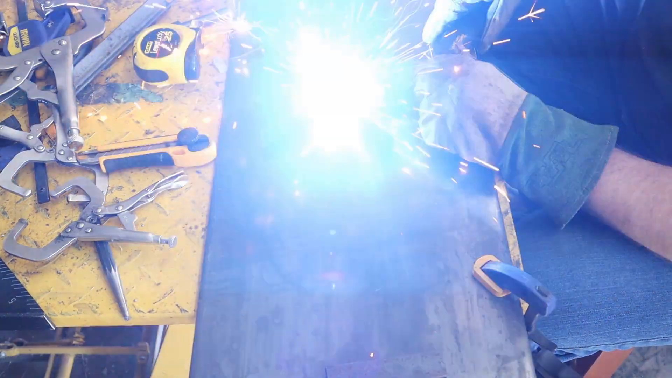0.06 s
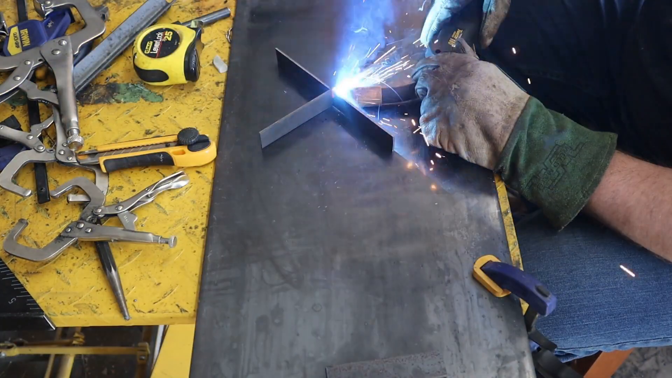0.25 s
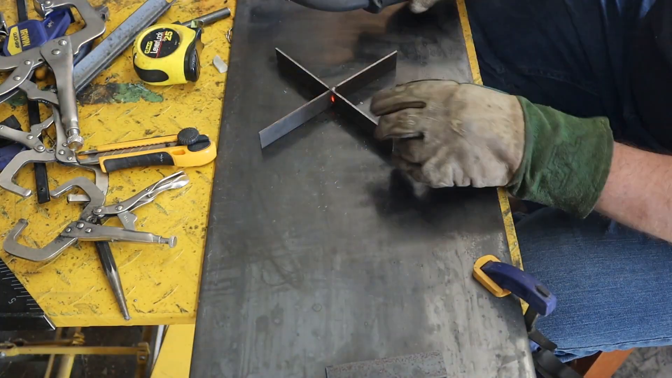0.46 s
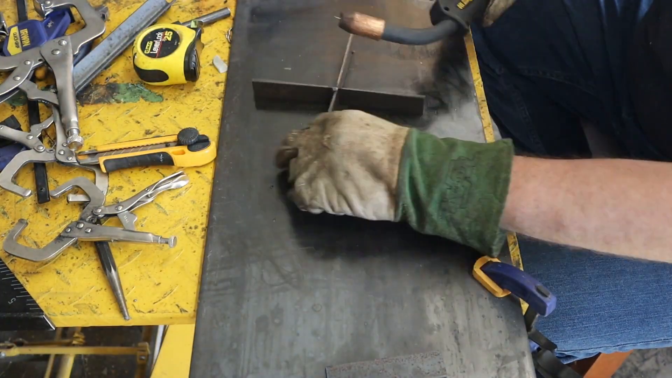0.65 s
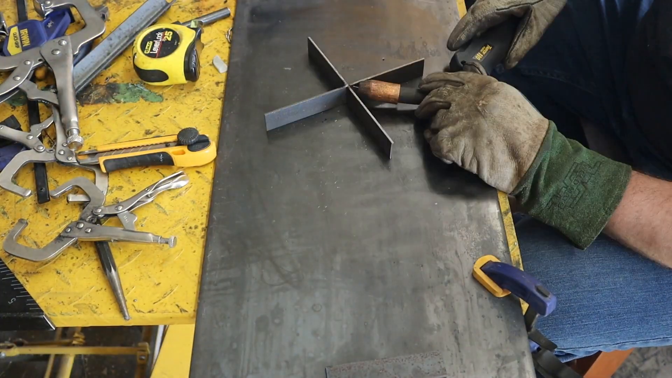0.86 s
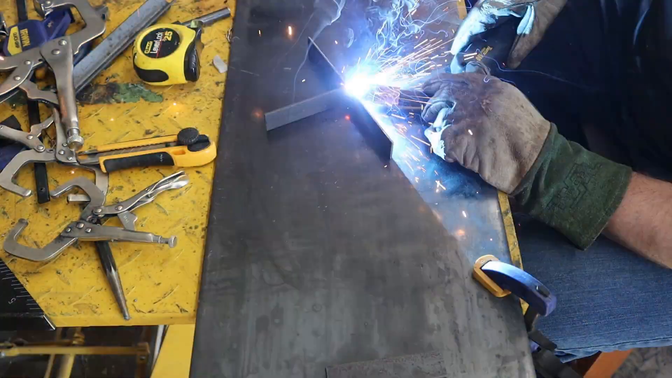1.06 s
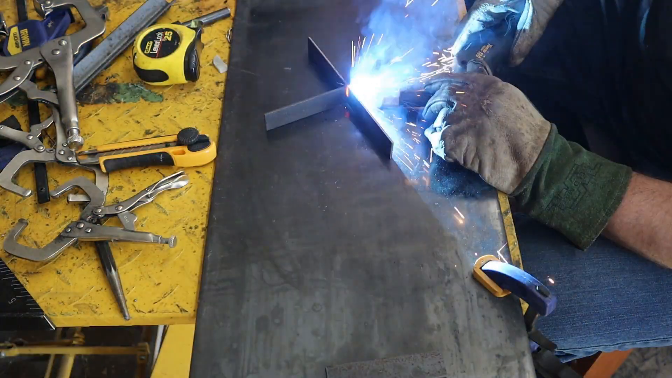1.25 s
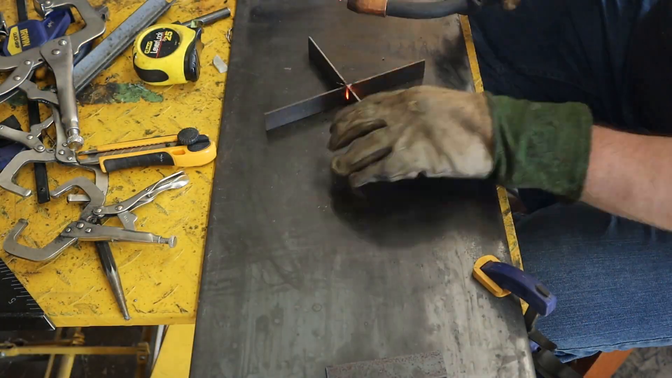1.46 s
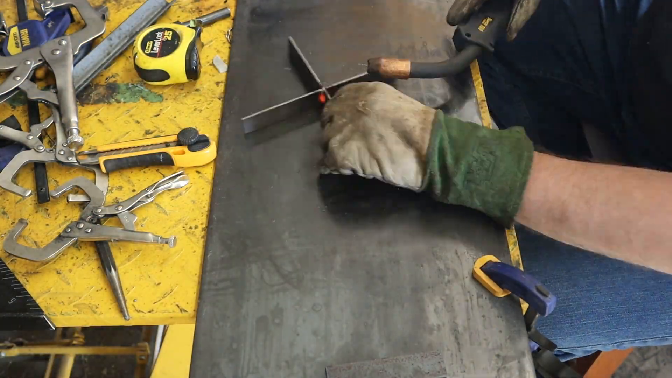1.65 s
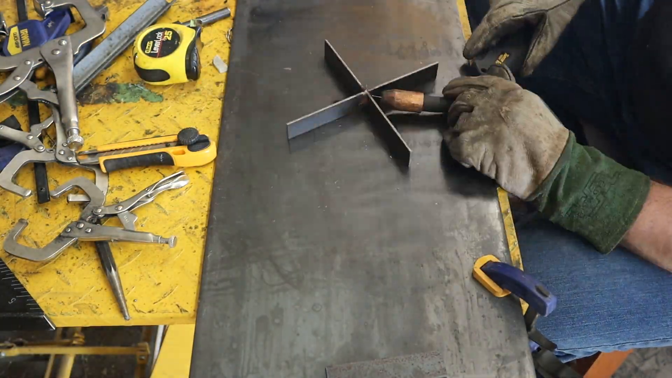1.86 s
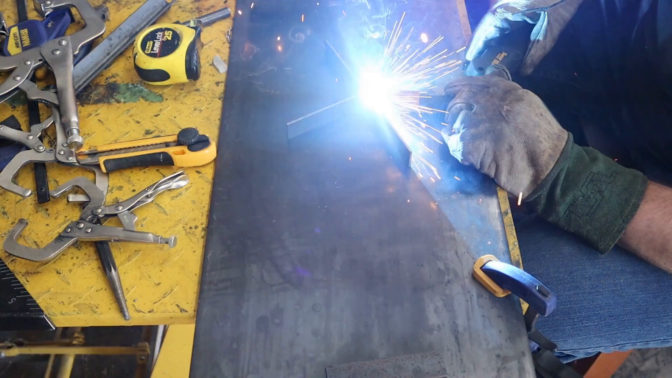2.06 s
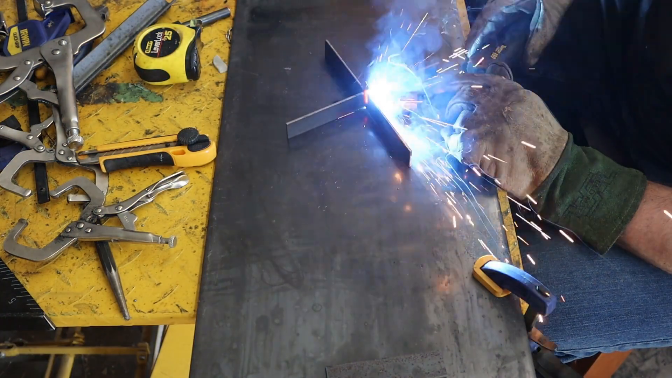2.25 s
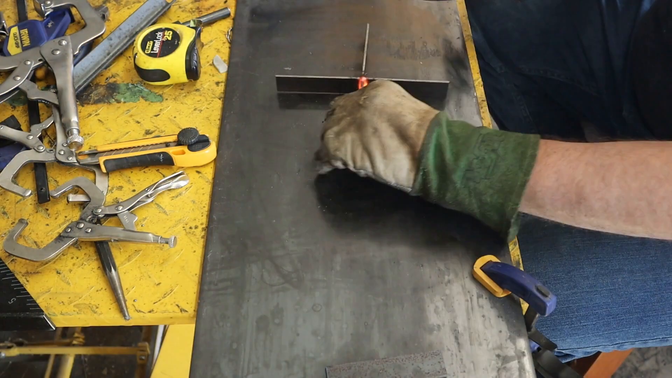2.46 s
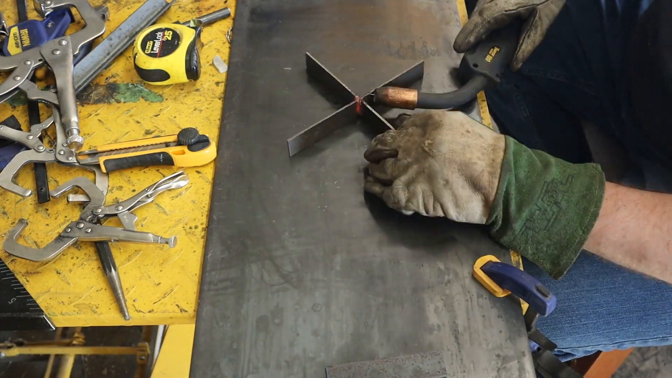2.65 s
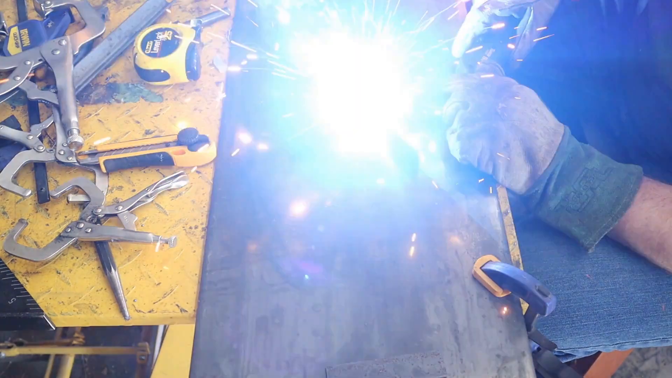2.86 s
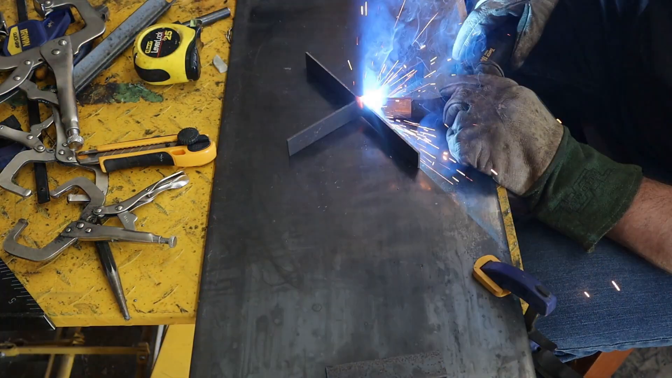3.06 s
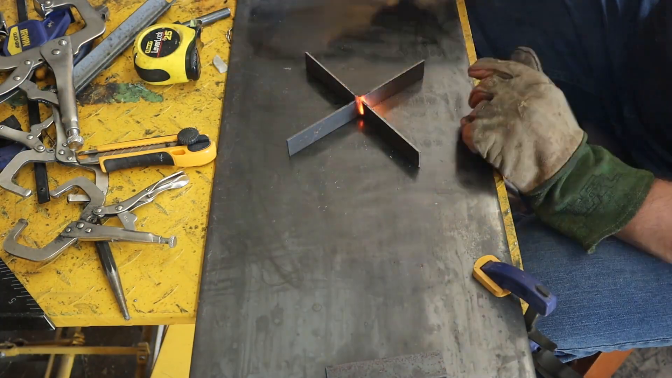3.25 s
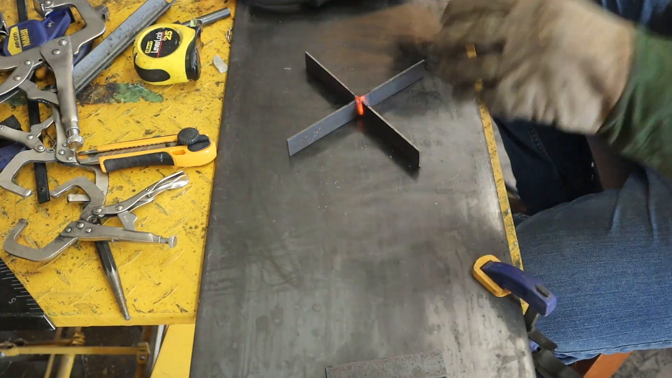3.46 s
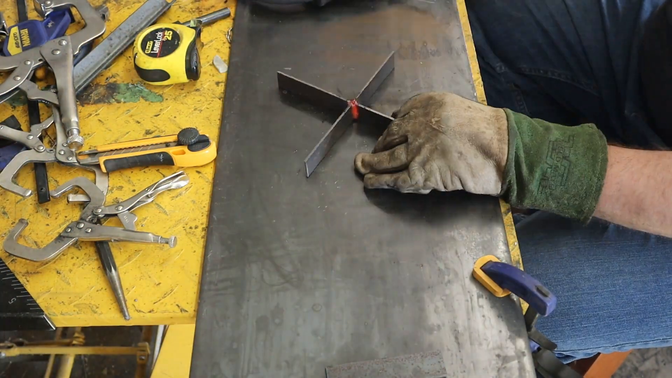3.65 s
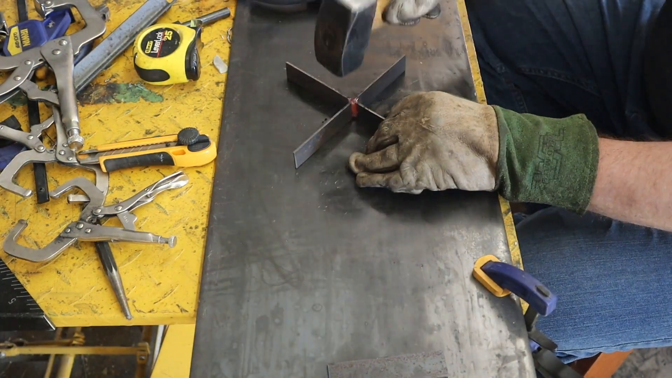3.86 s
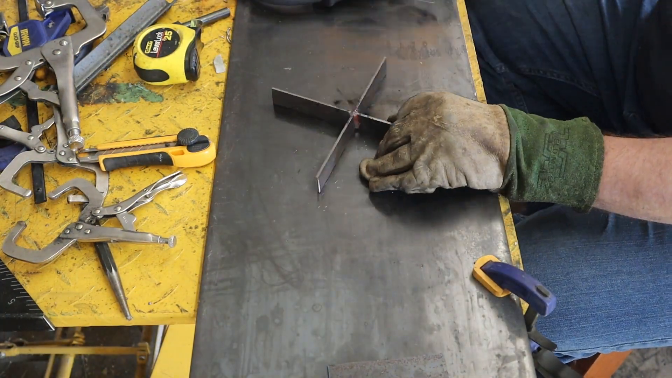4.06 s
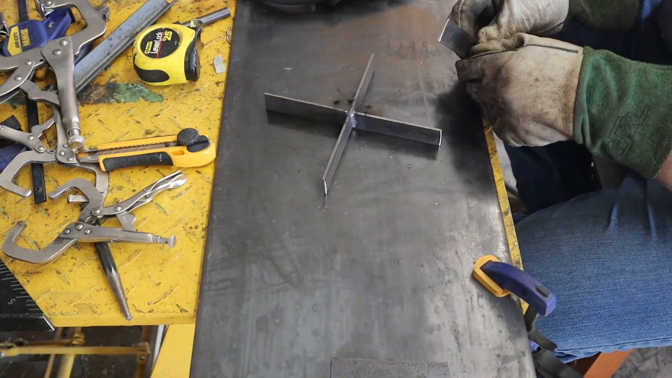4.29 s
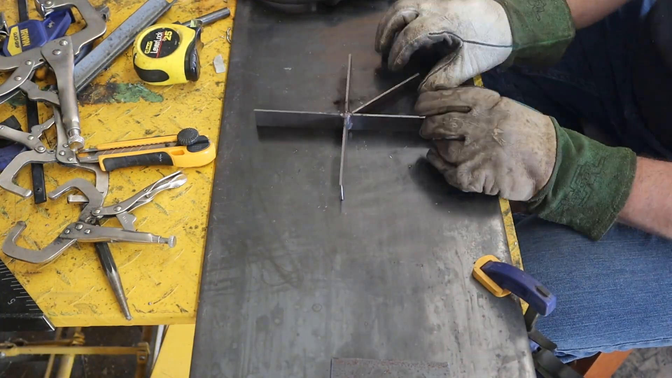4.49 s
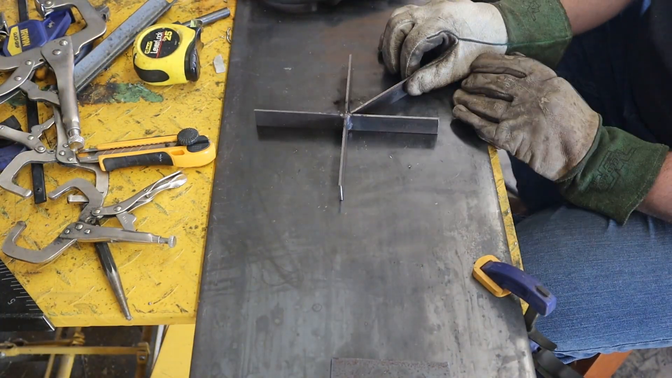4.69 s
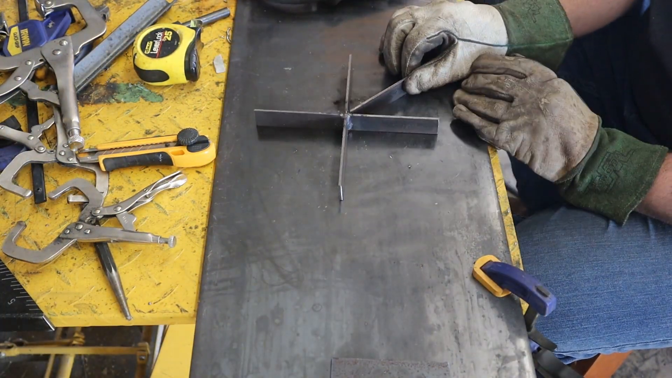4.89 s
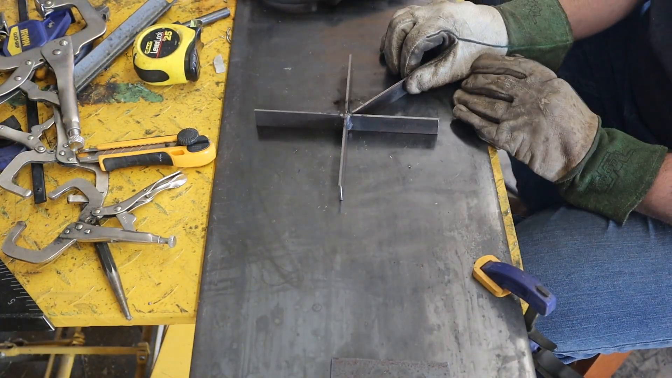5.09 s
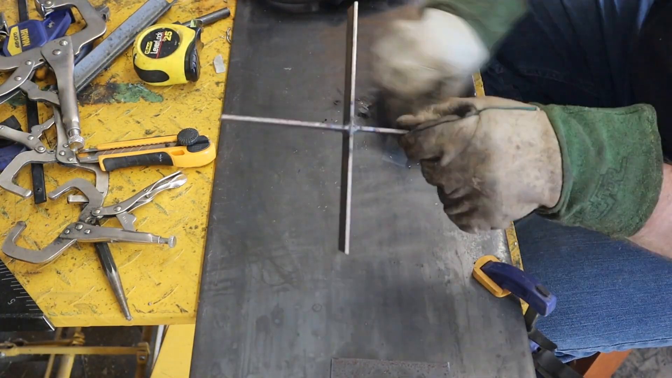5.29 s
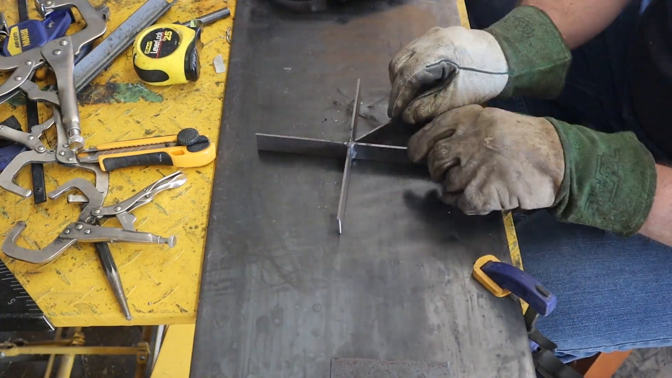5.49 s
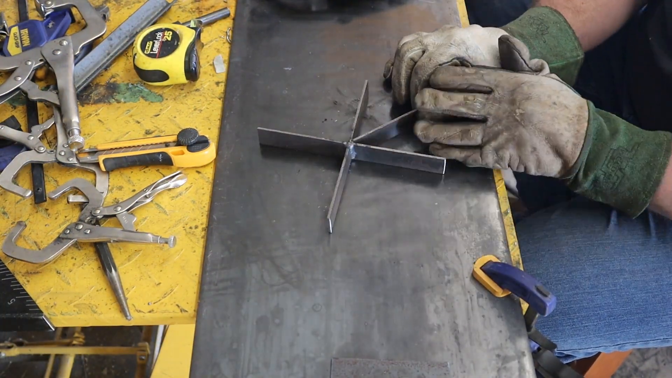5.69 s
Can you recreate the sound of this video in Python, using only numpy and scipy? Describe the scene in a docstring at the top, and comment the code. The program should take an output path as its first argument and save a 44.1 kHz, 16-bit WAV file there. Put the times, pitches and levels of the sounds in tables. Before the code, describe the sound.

Close by at a steel workbench, a welder's fan hums under four quick tack welds about a second apart. Each starts with a gas hiss, then buzzes, snaps and fizzes, sometimes popping. Steel bars shift with brief metallic scrapes in the gaps. One sharp hammer smack follows, then the fan alone, then a last scrape and clink. Everything sounds speeded up and spliced, and the fan dips under each loud sound.

```python
"""A welder's fan drones, then gas puffs and an arc spits rapid sparks over a fizz: steel bars are being
tack-welded on a steel bench, heard speeded up as short pieces of sound spliced end to end.
Each spark is the wire shorting and the arc re-striking; now and then molten wire bursts with a thump.
Between the four welds the bars scrape and ring, and after them a hammer lands once.
The drone sinks at each loud sound and climbs back."""
import sys
import numpy as np
from scipy.fft import rfft, irfft, next_fast_len
from scipy.io import wavfile
from scipy.ndimage import uniform_filter1d

SR = 44100
rng = np.random.default_rng(int(sys.argv[2]) if len(sys.argv) > 2 else 0)


def unload_wav(signal):
    """Save mono or channel-first audio to the path in sys.argv[1] as 16-bit WAV at rate SR, clipped to [-1, 1]."""
    wavfile.write(
        sys.argv[1],
        SR,
        np.round(np.clip(np.atleast_2d(signal).T, -1, 1) * 32767).astype(np.int16),
    )


N = 252693
PIECE = 1470  # samples in one spliced piece

# pitch of the high ring in the snaps and sizzle, drifting over time: time_s, pitch_hz
SNAP_PITCH = [(.2, 8970), (.35, 9680), (.55, 9630), (1.17, 9610), (1.32, 10450), (1.55, 10220),
              (2.2, 10060), (2.5, 10090), (3.05, 9600), (3.4, 10300)]
# arc envelopes, one list a weld: time_s, small_snap_db, hiss_db
WELDS = [
    [(.2, -12, -24.5), (.26, -14, -32.5), (.42, -9.5, -30), (.47, -21, -29), (.566, -27, -37)],
    [(1.167, -13, -35.5), (1.24, -9, -27.5), (1.33, -20, -37), (1.4, -12.5, -30), (1.46, -28, -32.5),
     (1.566, -29, -29)],
    [(2.167, -15, -36.5), (2.22, -9.5, -28), (2.32, -13.5, -34), (2.45, -15, -33), (2.533, -25, -38.5)],
    [(3.034, -13, -37), (3.16, -18, -35.5), (3.22, -14, -32), (3.29, -23, -34), (3.35, -17, -28.5),
     (3.4, -23, -31.5)],
]


def amp(db):
    """Gain of a level in dB."""
    return 10 ** (np.asarray(db) / 20)


def unit(x):
    """Rms 1 along the last axis."""
    return x / np.sqrt(np.mean(x ** 2, axis=-1, keepdims=True) + 1e-20)


def eq_gain(curve, hz):
    """Gain of an EQ curve drawn through (freq_hz, level_db) points on a log frequency axis."""
    freq_hz, level_db = np.transpose(curve)
    return amp(np.interp(np.log(hz + 1), np.log(freq_hz + 1), level_db))


def filtered(x, response):
    """x shaped by a gain that depends on frequency."""
    size = next_fast_len(x.shape[-1] + 4096)
    return irfft(rfft(x, size) * response(np.fft.rfftfreq(size, 1 / SR)), size)[..., :x.shape[-1]]


def spliced(x):
    """Every piece comes from another moment, so the joints click."""
    n = np.arange(N)
    start = rng.integers(0, N - PIECE, N // PIECE + 1)
    return x[..., start[n // PIECE] + n % PIECE]


def fan():
    """Air rush and blade tones; the level holds inside a piece, the tones slip in phase at each joint."""
    # colour of the rushing air: freq_hz, level_db
    air_eq = [(24, -59), (40, -22), (75, -24), (104, -19.5), (144, -17.5), (249, -8), (455, -12), (751, -2),
              (965, -13.5), (1550, -11), (2150, -17), (2320, -16), (4680, -23), (10200, -35), (16000, -57)]
    # blade tones: pitch_hz, level_over_drone_db, phase_slip_rad
    blade_tones = [(110.5, -21, 0.12), (760, -7, .6), (885, -20.5, 0.53), (1500, -14, 0.8),
                   (1597, -19.5, 0.87), (2230, -22, .8)]
    n = np.arange(N)
    piece = n // PIECE
    air = filtered(rng.standard_normal((2, N)), lambda hz: eq_gain(air_eq, hz))
    out = amp(-1.5) * spliced(unit(air))
    for hz, tone_db, slip in blade_tones:
        phase = np.cumsum(slip * rng.standard_normal(N // PIECE + 1))[piece]
        sway = amp(1.4 * rng.standard_normal(N // PIECE + 1))[piece]
        out[0] += np.sqrt(2) * amp(tone_db) * sway * np.sin(2 * np.pi * hz * n / SR + phase)
    return amp(ducked_drone_db((piece + .5) * PIECE / SR)) * out


def ducked_drone_db(t):
    """The drone drops at each listed dip, sinks to a floor and climbs back at a steady pace."""
    # where the drone gives way to loud sounds: fall_s, climb_s, floor_db
    dips = [(0.17, 0.55, -55.5), (1.172, 1.599, -57), (2.163, 2.568, -56), (3.031, 3.45, -53.5),
            (4.0, 4.07, -35.5), (4.103, 4.3, -47), (5.44, 5.5, -51.5)]
    full_db, drop_db, sink_db_per_s, climb_db_per_s = -29.0, 11.5, 131.5, 47
    db = np.full(len(t), full_db)
    for fall_s, climb_s, floor_db in dips:
        sinking = full_db - drop_db - sink_db_per_s * (t - fall_s)
        climbing = floor_db + climb_db_per_s * np.maximum(t - climb_s, 0)
        db = np.where(t > fall_s, np.minimum(np.maximum(sinking, climbing), full_db), db)
    return db


def grit_on_steel(rows):
    """Gritty noise with one resonant peak over ringing bar modes, one spliced piece a row."""
    # body of the bench top: freq_hz, level_db
    body_eq = [(50, -44), (120, -18), (250, -3.5), (1000, 2), (2000, -3.5), (4000, -50)]
    # an edge scraping on plate: freq_hz, level_db
    scrape_eq = [(700, -18.5), (2000, 2.5), (3500, 2), (6500, -5.5), (11000, -44)]
    # sheen of the finest grit: freq_hz, level_db
    sheen_eq = [(4000, -15.5), (7500, 3), (10500, 3.5), (13000, -16.5), (16000, -36)]
    # modes of the steel bars: pitch_hz, t60_s, level_db
    bar_modes = [(2950, 0.96, -1.5), (3370, 0.46, -3.5), (4220, 0.38, -4), (5040, 0.43, -6.5),
                 (5800, .4, -4.5), (6930, 0.36, -14.5), (7600, 0.33, -14.5), (8000, .3, -14.5),
                 (8450, .3, -15), (9700, .3, -21.5), (10140, 0.25, -5.5), (10900, .3, -15)]
    out = np.zeros((2, N + PIECE))
    hz, t = np.fft.rfftfreq(2 * PIECE, 1 / SR), np.arange(PIECE) / SR
    body, scrape, sheen = [unit(eq_gain(curve, hz)) for curve in (body_eq, scrape_eq, sheen_eq)]
    for start_s, level_db, body_db, sheen_db, swell_db, ring_hz, ring_db, bar_db in rows:
        resonance = amp(2 * (ring_db + 13.5)) / (1 + ((hz - ring_hz) / (0.03 * ring_hz)) ** 2)
        power = (amp(body_db) * body) ** 2 + scrape ** 2 + (amp(sheen_db) * sheen) ** 2 + resonance
        grit = amp(1.9 * unit(uniform_filter1d(rng.standard_normal(2 * PIECE), size=20)))
        noise = unit(grit * rng.standard_normal((2, 2 * PIECE)))
        piece = irfft(rfft(noise) * np.sqrt(power))[:, :PIECE]
        for mode_hz, t60, mode_db in bar_modes:
            lift_db = (mode_hz > 7000) * 0.45 * (sheen_db + 11.5)  # high modes follow the finest grit
            onset_db = bar_db - 4.5 + mode_db + lift_db + rng.normal(0, 1.1)
            cycles = mode_hz * rng.normal(1, 0.0052) * t + rng.random((2, 1))
            piece += amp(onset_db - 60 * t / t60) * np.sin(2 * np.pi * cycles)
        i = round(start_s * SR / PIECE) * PIECE
        out[:, i:i + PIECE] = amp(level_db + swell_db * np.linspace(-.5, .5, PIECE)) * piece
    return out[:, :N]


def gas():
    """Shielding gas hisses before and after each weld, always in the same colour."""
    # puffs of gas: start_s, level_db, swell_db
    puffs = [(0.167, -27.5, 1), (0.567, -47, -8), (1.1, -33.5, 2), (1.133, -38, -2), (1.567, -50, -7),
             (2.133, -35, -2), (2.533, -57.5, -8), (3.0, -44.5, 3), (3.4, -54.5, -9.5)]
    body_db, sheen_db, ring_hz, ring_db, bar_db = -7.5, -2.5, 3500, -15, -8
    return grit_on_steel([(start_s, level_db, body_db, sheen_db, swell_db, ring_hz, ring_db, bar_db)
                          for start_s, level_db, swell_db in puffs])


def fizz_gains():
    """Sizzle and hiss gains: flickering from piece to piece of a weld, silent between welds."""
    sizzle_base_db, snap_share, flicker_db = -27.5, 0.65, 1.32
    t = (np.arange(N // PIECE + 1) + .5) * PIECE / SR
    time_s, snap_db, hiss_db = np.transpose(sum(WELDS, []))
    burning = sum((t > weld[0][0]) & (t < weld[-1][0]) for weld in WELDS)
    sizzle_db = sizzle_base_db + snap_share * np.interp(t, time_s, snap_db)
    db = np.array([sizzle_db, np.interp(t, time_s, hiss_db)])
    gains = burning * amp(db + flicker_db * rng.standard_normal(db.shape))
    return np.repeat(gains, PIECE, axis=1)[:, :N]


def fizz():
    """The arc's broad hiss and a narrow sizzle at the snaps' pitch, in bursts of a millisecond or two."""
    # colour of the arc's hiss: freq_hz, level_db
    hiss_eq = [(60, -48.5), (120, -13), (900, -4.5), (2000, -4.5), (3200, -1), (5300, -6), (7500, -3.5),
               (10500, -2), (11500, -6), (14000, -16), (16000, -41.5)]
    sizzle_gain, hiss_gain = fizz_gains()
    bursts = amp(3 * unit(uniform_filter1d(rng.standard_normal(N), size=50)))
    hiss = filtered(bursts * rng.standard_normal((2, N)), lambda hz: eq_gain(hiss_eq, hz))
    ring_hz = np.interp(np.arange(N) / SR, *np.transpose(SNAP_PITCH))
    phase = 2 * np.pi * np.cumsum(ring_hz) / SR
    low_noise = filtered(rng.standard_normal((2, 2, N)), lambda hz: np.exp(-(hz / 1000) ** 2))
    sizzle = bursts * (low_noise[0] * np.sin(phase) + low_noise[1] * np.cos(phase))
    return sizzle_gain * unit(sizzle) + hiss_gain * unit(hiss)


def short_circuits():
    """Cue list of the loud sparks, plus small ones that fill the gaps at the pace of the buzz."""
    # the wire's loudest short circuits: start_s, snap_db, crack_over_snap_db
    loud_sparks = [(0.204, 3.5, -11), (0.209, 3.5, -12), (0.2173, 5, -7.5), (0.228, -3, -24),
                   (0.2361, -0.5, -10), (0.243, -9, -7), (0.253, -8.1, -16), (0.2647, -7, -27.4),
                   (0.278, -11, -9), (0.2993, -12, -11.3), (0.3273, -7, -12), (0.339, -10.5, -12),
                   (0.3528, -12, -10), (0.3691, -11, -9), (0.376, -1, -11), (0.385, -6, -2.5),
                   (0.3972, -7, -12), (0.426, -8.5, -11), (0.435, -11.5, -5), (0.4504, -13, -8),
                   (0.4686, -2, -5), (0.48, -18, -2), (0.5087, -23, -2), (0.527, -26, 1.7), (0.544, -26, 6),
                   (0.5644, -24.5, 4.5), (1.1665, -8, -8), (1.184, -5.5, -21), (1.1895, -6.7, -12),
                   (1.198, -3.5, -9), (1.2044, -10, -4), (1.2131, -6.5, -8), (1.2216, -5, -9),
                   (1.2285, -4.5, -7), (1.2391, -4, -13), (1.2463, -4.5, -10), (1.253, -2, -10.5),
                   (1.2786, -11.5, -11), (1.2921, -4.5, -19), (1.312, -12.5, -2), (1.3192, -21, -5),
                   (1.3312, -10.5, -14), (1.3521, -13, -7.6), (1.3751, -3.5, -11), (1.398, -11, -6.5),
                   (1.4267, -17, -2), (1.4731, -17.5, -1), (1.507, -9, 0.5), (1.516, -7, -4.5),
                   (1.5247, -21, 2.5), (1.5341, -28, 5), (1.5467, -23, 3.5), (1.566, -28, 6),
                   (1.762, -30, 0), (2.175, -4, -3), (2.19, -7, -13), (2.1984, -9, -17),
                   (2.2033, -2, -17.5), (2.218, 0, -13), (2.2291, -9, -3.5), (2.2408, -4, -7.5),
                   (2.2556, -5.5, -6.5), (2.2735, -5, -4.5), (2.2933, -7.5, -4.5), (2.2997, -9.5, -8.5),
                   (2.3278, -13, -8), (2.3392, -12.5, -6.5), (2.3457, -12, -8), (2.357, -21.5, -1.5),
                   (2.3635, -16.5, -6.5), (2.377, -14, -10), (2.3967, -9.5, -9), (2.4066, -17, -6.7),
                   (2.414, -17, -3), (2.4357, -12, -4), (2.4557, -10.5, -6.5), (2.4674, -13.5, -4),
                   (2.477, -17, -4), (2.4841, -24.5, -2), (2.4914, -20, -12), (2.509, -27.5, 3),
                   (2.526, -17, 1), (3.0476, -7.5, -18), (3.0561, -3, -12.5), (3.0641, -12.5, -7),
                   (3.0878, -5, -6.5), (3.1198, -4.5, -11), (3.147, 3, -5.5), (3.1622, -10, -10),
                   (3.1816, -7, -9), (3.1922, -8, -8), (3.208, -8, -3.5), (3.218, -8, -7), (3.2273, -7, -5),
                   (3.241, -18, -1.5), (3.2506, -7, -9), (3.2846, -9, -8.5), (3.303, -18.5, 1.5),
                   (3.3245, -23.5, 7.5), (3.3396, -17.5, 2), (3.3607, -12, -4), (3.3736, -23.5, 4),
                   (3.3957, -27, 5)]
    # stretches of unbroken buzzing: start_s, end_s, spark_gap_s
    buzzes = [(.2, .57, .0078), (1.165, 1.32, .0082), (1.345, 1.57, .0078), (2.17, 2.302, .0066),
              (2.37, 2.41, .0066), (2.43, 2.46, .0066), (3.18, 3.4, .0095)]
    jitter_s, snap_scatter_db, mean_crack_db, crack_scatter_db = .0008, 1.5, -21, 2.5
    loud_s = np.array(loud_sparks)[:, 0]
    small_s = np.concatenate([np.linspace(a, b, max(round((b - a) / gap_s), 1), endpoint=False)[1:]
                              for a, b in zip(loud_s, loud_s[1:])
                              for start_s, end_s, gap_s in buzzes if start_s < a and b < end_s])
    time_draw, snap_draw, crack_draw = rng.standard_normal((len(small_s), 3)).T
    time_s, arc_db, _ = np.transpose(sum(WELDS, []))
    snap_db = np.interp(small_s, time_s, arc_db) + snap_scatter_db * snap_draw
    crack_db = mean_crack_db + crack_scatter_db * crack_draw
    return loud_sparks + list(zip(small_s + jitter_s * time_draw, snap_db, crack_db - snap_db))


def sparks():
    """The wire touches with a tick; the arc re-strikes with a crack and a snap; the bench top answers."""
    # the two twins carry the snap a quarter turn apart: phase_rad
    twin_phase = [
        [0],
        [np.pi / 2],
    ]
    lead = 80  # samples from the wire's touch to the re-strike
    out, n = np.zeros((2, N + SR)), np.arange(1000)
    t = np.maximum(n - lead, 0) / SR
    cues = short_circuits()
    noise = rng.standard_normal((len(cues), 2, 2, len(n)))
    grains = unit(uniform_filter1d(noise, size=12))
    push_age = t / .00008
    push = -push_age * (1 - .5 * push_age) * np.exp(1 - push_age) * 1.85  # the crack's pressure pulse
    touch = amp(-17) * np.exp(-((n - 15) / 12) ** 2)
    strike = 1.3 * amp(-60 * t / .0026) * (1 - np.exp(-t / .00003))
    tail_attack = 1 - np.exp(-t / .0003)
    for (start_s, snap_db, crack_db), grain, chance in zip(cues, grains, noise[:, 0, :, :3]):
        snap_hz = np.interp(start_s, *np.transpose(SNAP_PITCH)) + 350 * chance[0, 0]
        envelope = strike + grain[0] * (touch + amp(-6.0 - 60 * t / 0.0067) * tail_attack)
        snap = -envelope * np.sin(2 * np.pi * snap_hz * (n - lead) / SR + .5 * chance[0, 1] + twin_phase)
        edge = -.7 * amp(-60 * t / 0.0022) * np.sin(2 * np.pi * (5200 + 800 * chance[:, 2:]) * t)
        tail = 0.23 * tail_attack * grain[1] * amp(-60 * t / 0.01)
        crack = push * [[1], [0.2 * chance[1, 0]]] + edge + tail
        spark = snap + amp(crack_db) * crack
        spark += 0.11 * np.roll(spark, 48, axis=1)  # echo of the bench top
        i = round(start_s * SR) - lead
        out[:, i:i + len(n)] += amp(snap_db) * spark
    return out[:, :N]


def pops():
    """Molten wire bursts: a pressure jump that swings back under zero."""
    # thumps of bursting wire: start_s, level_db
    bursts = [(0.2096, -7.5), (0.228, -4), (0.385, -2.5), (1.2134, -18), (1.2922, -22.5), (2.1664, -9.5),
              (2.1749, -17), (2.19, -17), (2.2039, -13), (2.218, -10), (3.0572, -19.5), (3.148, 1.5)]
    out, t = np.zeros((2, N)), np.arange(1000) / SR
    swing_s, attack_s = 0.0021, 0.000199
    thump = (1 - t / swing_s) * np.exp(-t / swing_s) * (1 - np.exp(-t / attack_s))
    side = amp(0.5) * (thump - np.roll(thump, 60))  # the far side hears it later
    for start_s, level_db in bursts:
        i = round(start_s * SR)
        out[:, i:i + len(t)] += amp(level_db) * np.array([thump, side])
    return out


def scraping_bars():
    """Friction of bars and tools on the bench; a contact rings harder the more the bench sounds."""
    # contacts: start_s, level_db, body_db, sheen_db, swell_db, ring_hz, bar_db
    contacts = [(0.667, -48, -0.5, -11, -4, 3880, -10), (0.7, -30, -7, -2.5, -7.5, 4950, -3),
                (0.733, -41, 1, -14, -4, 4263, 1), (0.767, -46.5, -2, -6, 1, 3930, 1),
                (0.833, -47, 2.5, -8, 8, 1528, -8), (0.9, -38, -4, -18, -4, 2920, 7),
                (1.667, -38, -10, -13, -4, 5640, -2), (1.7, -47, -2, -11, -5, 4330, -1),
                (1.733, -47, -2.5, -11.5, 23, 1360, -6), (1.833, -49.5, 4.5, -8, 0, 2920, -10),
                (1.867, -49.5, 11, -16, -5, 1119, -10), (2.667, -50.5, 2.5, -18, -2, 1614, -10),
                (2.7, -44, -2.5, -11, 1.4, 2060, 1.5), (2.733, -47, 6, -15.5, -5, 3300, -1),
                (2.767, -45, 0.5, -5, -5, 3930, -12), (3.467, -34.5, 3, -13, -1, 1965, -2),
                (3.5, -55, 4, -22, -8, 1916, -10), (3.733, -51, -4, -4, -8, 2153, -10),
                (3.767, -34, 12.5, -17, -7, 1340, 7.5), (3.967, -26, 3, -9, -3.5, 1227, -10),
                (4.0, -38, 3.5, -30.5, -6, 1880, -14), (4.033, -26.5, 5.5, -11.9, 0, 2170, -7),
                (4.1, -29, 2.5, -16, -10, 3080, -12), (4.133, -26, 3, -8.5, -1, 2120, -6),
                (4.167, -37.5, 3.5, -19, -6, 1227, -10), (4.233, -37.5, 6, -24, -3, 1470, -15),
                (4.333, -49.2, 2.5, -10, -4, 1614, -10), (4.533, -40, 4.5, -23, 0, 3300, -3),
                (5.367, -34.5, -7, -6.5, -9, 3208, 1), (5.4, -27.5, 3.5, -8.5, 7.5, 2150, -2),
                (5.433, -14, -18, -21, 4, 2840, -1.5), (5.467, -24, -7.5, -15, -1, 2084, -14),
                (5.5, -24.1, -12.5, -13.5, 3, 2066, -9), (5.533, -35, -8, -16, -4, 3423, -12),
                (5.567, -37.5, -0.5, -12, -1.2, 4457, -15.5), (5.6, -53.5, 4, -12, 5, 4349, -12)]
    ring_base_db, body_share = 1.9, 0.29
    return grit_on_steel([
        (start_s, db, body_db, sheen_db, swell_db, ring_hz, ring_base_db + body_share * body_db, bar_db)
        for start_s, db, body_db, sheen_db, swell_db, ring_hz, bar_db in contacts])


def hammer():
    """One blow on bar and bench, a noisy smack and a short ring, cut off by the next joint."""
    # the blow: start_s, level_db
    blow = (4.0925, 2.6)
    # modes of the struck bench: pitch_hz, level_db, t60_s
    bench_modes = [(70, -10.5, 0.023), (240, -7.5, 0.016), (512, -16, 0.028), (730, -5, 0.025),
                   (1200, -1.5, 0.018), (1500, -6, 0.015), (3080, -18.5, 0.045), (4830, -13.5, 0.034),
                   (9300, -11.5, 0.039), (10360, -13.5, 0.029)]
    start_s, level_db = blow
    i = round(start_s * SR)
    t = np.arange(PIECE - i % PIECE) / SR
    ring = sum(amp(db - 60 * t / t60) * np.sin(2 * np.pi * hz * t + rng.uniform(0, 1, (2, 1)))
               for hz, db, t60 in bench_modes)
    smack = 1.1 * amp(-60 * t / 0.018) * rng.standard_normal((2, len(t)))
    out = np.zeros((2, N))
    out[:, i:i + len(t)] = amp(level_db) * (ring + smack)
    return out


def scene():
    """Each source comes as two twins: one is the mid, the other the side, stronger in the treble."""
    # how sharp blows reach the listener: freq_hz, gain_db
    blow_eq = [(20, -9), (80, -1.5), (5500, 1), (10700, -0.5), (11800, -5), (13000, -9), (16000, -14.5)]
    # stereo width: freq_hz, side_gain_db
    width_eq = [(60, -11), (110, -11.5), (200, -15.5), (380, -13), (700, -7.5), (1290, -0.5), (2380, 0.5),
                (4400, 3), (8120, 3), (15000, 3.5)]
    blows = filtered(sparks() + pops() + hammer(), lambda hz: eq_gain(blow_eq, hz))
    mid, twin = fan() + fizz() + gas() + scraping_bars() + blows
    side = filtered(twin, lambda hz: eq_gain(width_eq, hz))
    return np.array([mid + side, mid - side])


def record(dry):
    """A soft clip rounds the peaks, then a steep low-pass cuts the extreme treble."""
    ceiling, top_hz = 0.87, 16000
    clipped = dry / (1 + np.abs(dry / ceiling) ** 6) ** (1 / 6)
    return filtered(clipped, lambda hz: np.clip((top_hz - hz) / 500 + .5, 0, 1) ** 2)


dry = scene()
out = record(dry)
unload_wav(out)
```